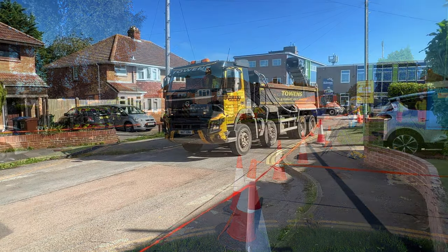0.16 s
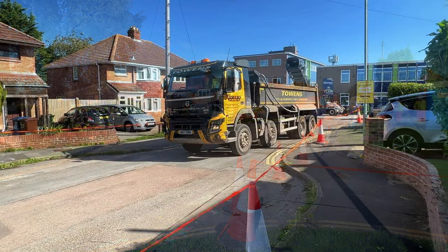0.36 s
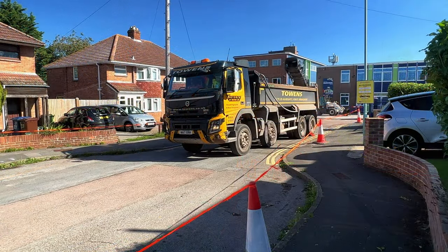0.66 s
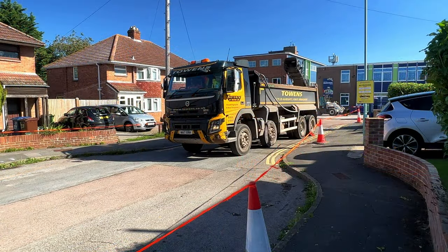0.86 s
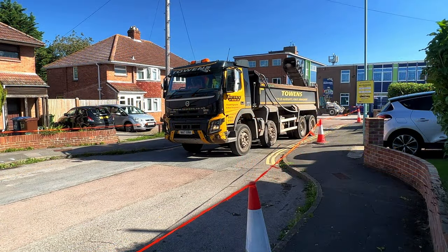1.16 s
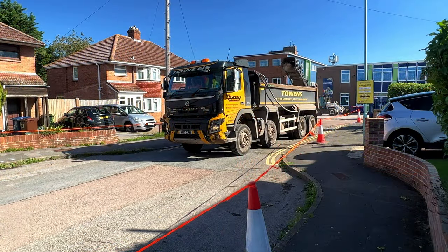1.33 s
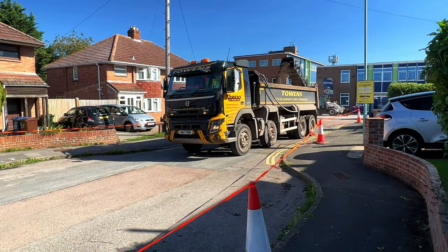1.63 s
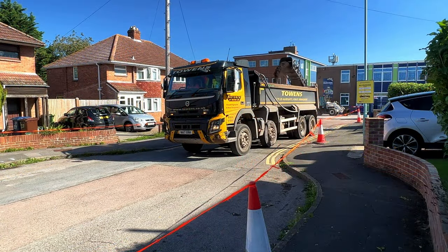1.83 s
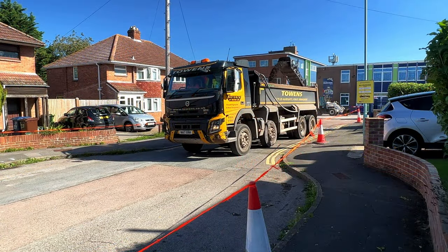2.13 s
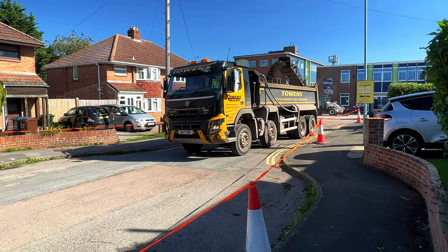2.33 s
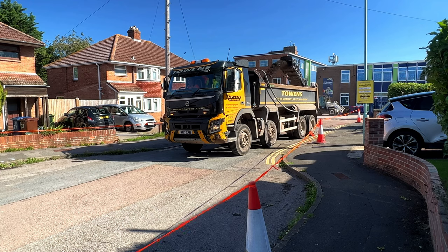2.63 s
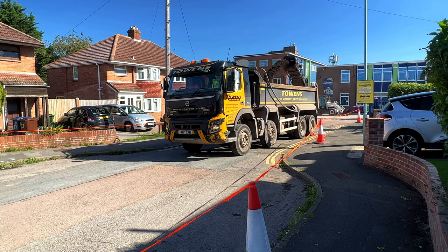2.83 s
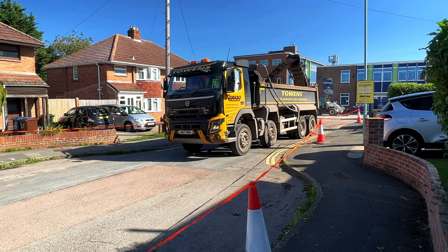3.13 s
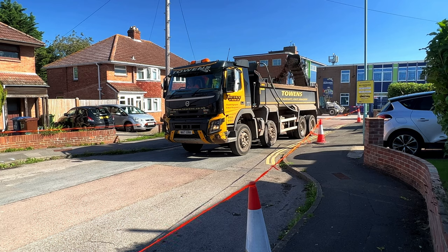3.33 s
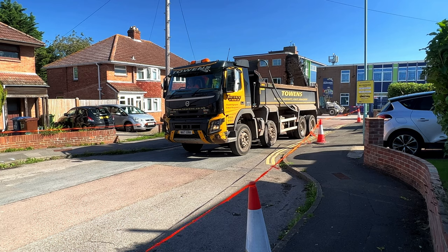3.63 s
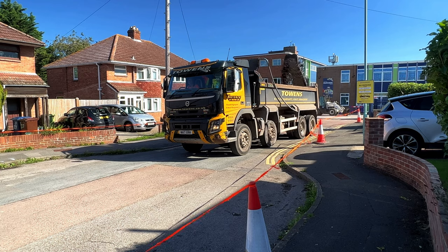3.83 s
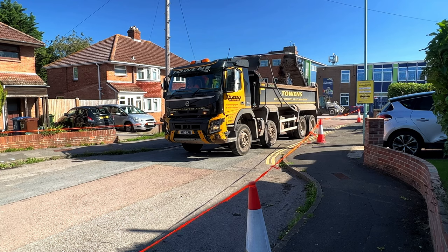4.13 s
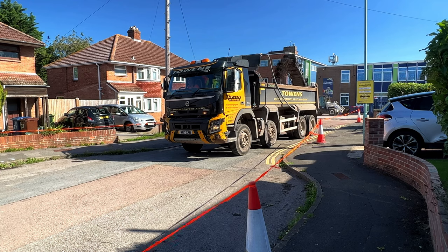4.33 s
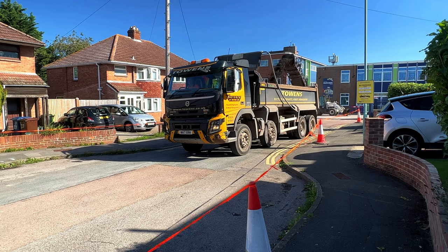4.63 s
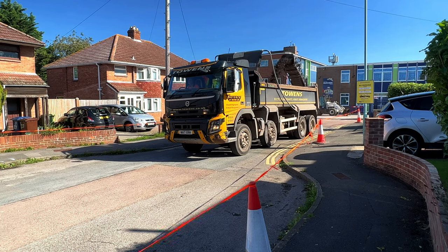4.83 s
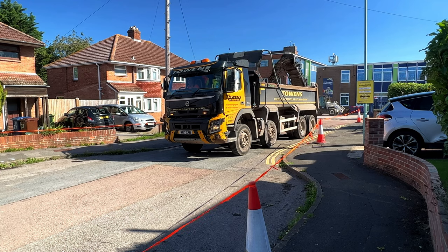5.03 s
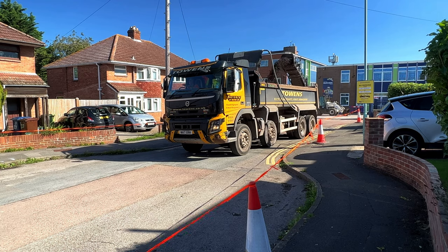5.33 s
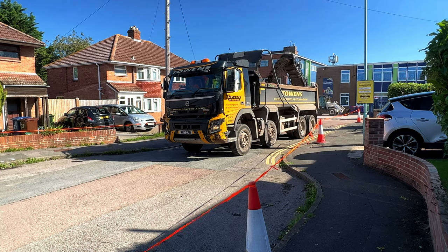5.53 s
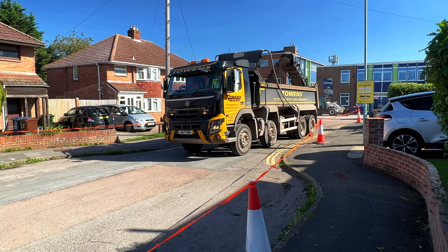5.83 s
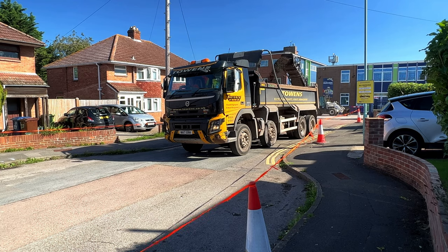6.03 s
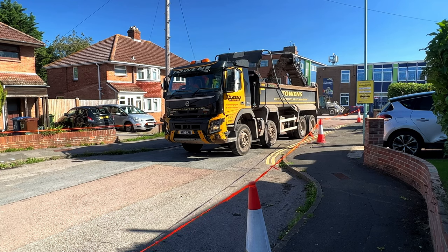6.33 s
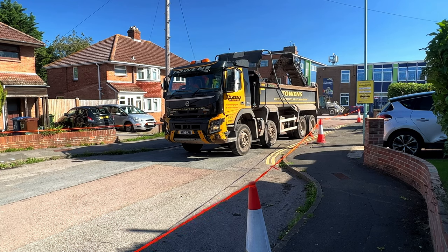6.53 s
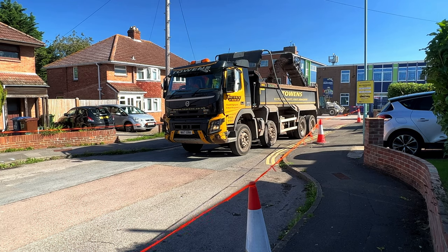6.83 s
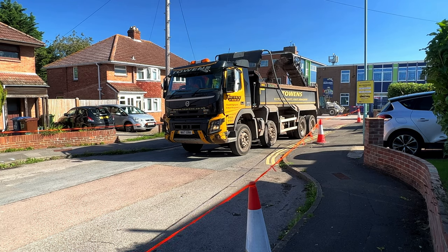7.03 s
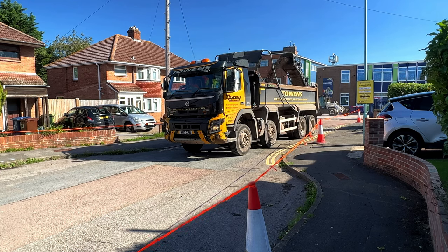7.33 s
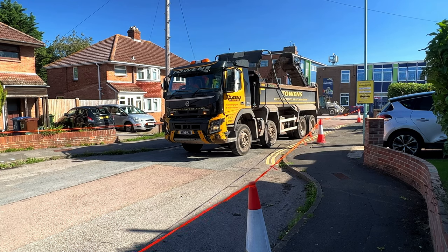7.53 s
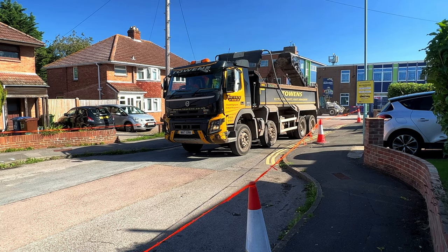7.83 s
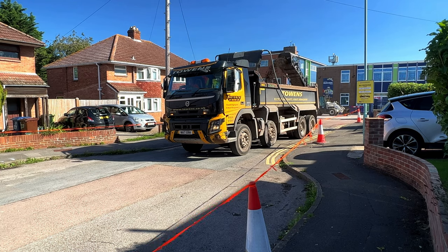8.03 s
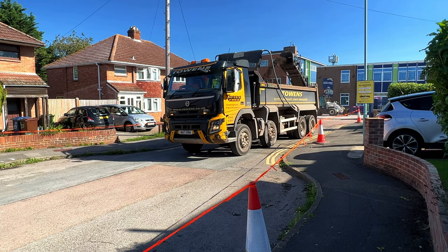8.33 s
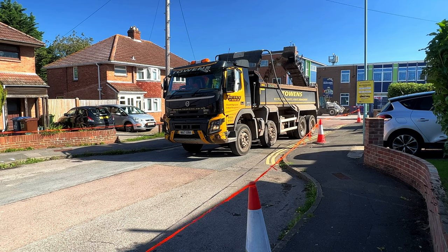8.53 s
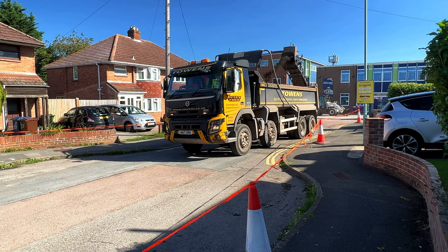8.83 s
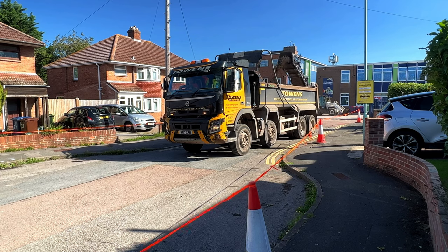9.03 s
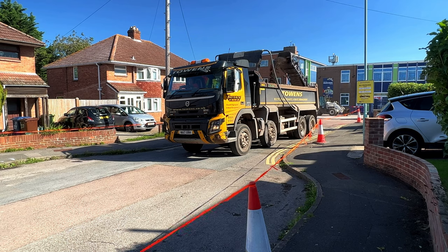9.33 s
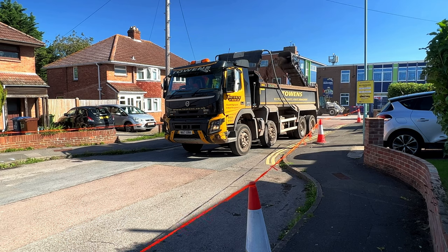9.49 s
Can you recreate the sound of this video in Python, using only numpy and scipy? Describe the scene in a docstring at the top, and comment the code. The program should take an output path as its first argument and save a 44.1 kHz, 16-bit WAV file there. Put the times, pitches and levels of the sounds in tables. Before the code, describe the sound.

A heavy diesel machine drones and grinds asphalt while broken chunks pour clattering into a steel truck body, thinning to scattered stones and grit.

```python
"""A road planer's diesel drones behind a tipper lorry in a street of houses: tones at multiples of
the engine cycle, hums of pumps and drives, shaped noise for exhaust and cutter.
Its conveyor throws milled asphalt into the lorry: a few spatters, a heavy pour that drums on the
steel body and thins to a trickle, then single clods, stones and handfuls of grit. These are random
impacts, noise bursts in resonances, and decaying modes, with a short tail from the house fronts."""
import sys
import numpy as np
from scipy import signal
from scipy.fft import rfft, irfft, next_fast_len
from scipy.io import wavfile
from scipy.ndimage import uniform_filter1d, map_coordinates

SR = 44100
rng = np.random.default_rng(int(sys.argv[2]) if len(sys.argv) > 2 else 0)


def transcribe(u):
    """Save the signal u as a 16-bit wav file named by the first command-line argument.

    u: samples, shape (n,) or (channels, n), limited to [-1, 1]; the rate is SR.
    q: integer samples, one column per channel.
    """
    v = np.clip(np.atleast_2d(u).T, -1, 1)
    q = np.round(v * 32767).astype(np.int16)
    wavfile.write(sys.argv[1], SR, q)


N = 426006

# Rough colour of the falling grit, brightest near 3 kHz; the dips at 10 and 13 kHz are not the
# grit's own. Each row: frequency in Hz, relative density in dB per Hz.
GRIT_COLOUR = [(250, -31), (600, -4), (1000, -7), (1500, -7.5), (2100, -5), (3000, -0.5), (4300, -3),
               (5200, -6.5), (6500, -7.5), (8000, -11.5), (9300, -13.5), (10000, -35), (11700, -18),
               (13000, -35), (15700, -30)]
LOUD_DB = -25.5  # drone level at which the planer's tones have their tabled balance


def planer():
    """Diesel, drives and cutter share one heard level; the cutter crunches asphalt as the pour does."""
    # How loud the drone is heard. Each row: time in seconds, drone level in dB.
    drone_rows = [(0, -27), (.7, -23.5), (2.33, -24), (2.5, -29.5), (3.3, -33), (3.8, -40), (5.2, -42.5),
                  (6.7, -41.5), (8.2, -39), (9.66, -36.5)]
    cycle_hz, cutter_db, tones_db = 15.08, -5.5, -2.0
    drone_db = curve(drone_rows)
    cycles = np.cumsum(cycle_hz * (1 + 0.0042 * wobble(3))) / SR
    tones = exhaust_tones(cycles, drone_db) + hums(drone_db)
    shared_only = np.array([[np.sqrt(2)], [0]])  # no unshared part at the ports
    drone = roar(cycles) + whine() + amp(tones_db) * tones * shared_only
    cutter = amp(cutter_db + 0.53 * wobble(11)) * crunch()
    return amp(drone_db) * (drone + cutter)


def exhaust_tones(cycles, drone_db):
    """Exhaust pulses repeat with the engine cycle, giving tones whose balance shifts with heard level."""
    # Each row: multiple of the engine cycle, relative level in dB, extra dB per dB of drone.
    order_rows = [(4, -16.5, -0.6), (5, -7.5, 0), (6, -14, -.1), (10, -10, 0.5)]
    waver_db = 2.5
    tones = np.zeros(N)
    for multiple, db, grows in order_rows:
        gain = amp(db + grows * (drone_db - LOUD_DB) + waver_db * wobble(6.6))
        tones += gain * np.sqrt(2) * np.sin(2 * np.pi * (multiple * cycles + rng.random()))
    return tones


def hums(drone_db):
    """Pumps, drives and the lorry each hum on one wandering line; one pump line is strongest."""
    # Each row: frequency in Hz, relative level in dB, extra dB per dB of drone.
    hum_rows = [(79.6, -18, -0.5), (126.3, -14.5, 0), (160, -21, -.5), (185.4, -19.5, 0), (230, -13, 0.5),
                (305.7, -16.5, -0.5), (377, -17, 0)]
    # The strongest hum. Each row: time in seconds, relative level in dB.
    pump_rows = [(0, -6), (.85, -9.5), (1.3, -12), (9.66, -14)]
    total = amp(curve(pump_rows)) * hum_tone(210.2)
    for hz, db, grows in hum_rows:
        total += amp(db + grows * (drone_db - LOUD_DB)) * hum_tone(hz)
    return total


def hum_tone(hz):
    """One sine that wanders slowly in pitch and level."""
    drift_share, waver_db = 0.00503, 3
    turns = np.cumsum(hz * (1 + drift_share * wobble(4))) / SR
    return amp(waver_db * wobble(3)) * np.sqrt(2) * np.sin(2 * np.pi * (turns + rng.random()))


def roar(cycles):
    """Exhaust noise pulses five times an engine cycle; with a rough growl band it surges unevenly."""
    # Spectrum of the exhaust. Each row: frequency in Hz, relative density in dB per Hz.
    exhaust_spectrum = [(20, -42), (38, -15), (57, -0.5), (75, -2.5), (110, 0), (160, -4.5), (200, -6),
                        (300, -5.5), (420, -6.5), (500, -10.5), (600, -12.5), (750, -23), (1500, -25),
                        (4000, -90)]
    # Growl. Each row: time in seconds, relative level in dB.
    growl_rows = [(0, -22), (.85, -22), (1.15, -5), (1.9, -5.5), (2.3, -13), (6.5, -8.5), (9.66, -7.5)]
    puffs_db, surging_db = 2.5, 1.03
    throb = np.cos(2 * np.pi * 5 * cycles)
    puffs = coloured(noise() * (1 + 0.1 * throb), exhaust_spectrum)
    growl = amp(curve(growl_rows)) * resonant(noise(), hz=295, q=2.6)
    return amp(surging_db * wobble(24)) * (amp(puffs_db) * puffs + growl)


def whine():
    """Drives and hydraulics whine roughly: noise in narrow bands."""
    # Each row: centre in Hz, distance to half gain in Hz, relative level in dB.
    whine_rows = [(436, 4.5, -16), (615, 19, -20), (1670, 28, -22), (1894, 10, -20.5)]

    def response(f):
        return sum(amp(db) * np.sqrt(SR / np.pi / width) / (1 + ((f - centre) / width) ** 2)
                   for centre, width, db in whine_rows)
    return filtered(noise(), response)


def crunch():
    """Asphalt breaking up: a rough rush studded with small impacts."""
    # Spectrum of the crunch. Each row: frequency in Hz, relative density in dB per Hz.
    grind_spectrum = [(25, -25), (70, -2), (200, -0.5), (550, 4.5), (760, 4.5), (900, 6), (1200, 4.5),
                      (1450, 2), (1900, 3), (2200, -0.5), (2750, -1.5), (3400, -15.5), (5200, -14.5),
                      (6700, -17.5), (9200, -21.5), (9900, -41), (15700, -37)]
    rush = noise() + 0.58 * impacts(900, spread_db=1.0, crumble_s=0.0015)
    return patchy(coloured(rush, grind_spectrum), depth_db=1.83)


def pour():
    """Stream and surges make one flow: more flow, denser impacts, crunch and drumming on steel."""
    # Steady stream off the conveyor. Each row: time in seconds, flow in dB.
    flow_rows = [(0, -43.5), (1.85, -43), (2.0, -24.5), (2.22, -23.5), (2.7, -21.5), (3.38, -24.5),
                 (3.55, -25), (3.9, -23), (4.52, -30.5), (4.6, -32), (5.15, -34.5), (5.35, -39),
                 (5.7, -40.5), (6.2, -38), (6.38, -45), (6.75, -46), (7.1, -46.5), (7.45, -47.5),
                 (7.8, -47), (8.4, -49), (9.66, -45.5)]
    # Heaps that tip off the belt. Each row: start in seconds, flow in dB, length in seconds.
    surge_rows = [(1.903, -29.5, 0.095), (1.987, -24, 0.16), (2.272, -21.5, 0.19), (2.537, -24.5, 0.32),
                  (2.93, -25.5, 0.045), (3.157, -27, 0.1), (3.562, -22.5, 0.15), (3.834, -29, 0.032),
                  (4.238, -27, 0.12), (4.415, -30.5, 0.096), (4.716, -32.5, 0.057), (4.892, -38, 0.12),
                  (5.373, -38, 0.08), (5.538, -35.5, 0.095), (5.77, -47, 0.1), (6.094, -41.5, 0.22),
                  (7.24, -54, 0.14), (8.82, -44.5, 0.18), (9.367, -33, 0.048), (9.422, -28.5, 0.044)]
    # Boom of the lorry body. Each row: frequency in Hz, relative density in dB per Hz.
    body_spectrum = [(40, -32), (90, -15), (125, -3.5), (170, 5), (225, -1), (275, -4), (400, 1),
                     (520, -4.5), (650, 2), (800, -9.5), (1000, -9.5), (1500, -9), (4000, -53)]
    full_db = -18.5  # flow of a full belt
    grit_db, ring_db, chips_db, crunch_db, boom_db = 3, -6.5, -6.5, -3.5, -5.5  # shares at full flow
    crunch_grows, boom_grows = 1.17, 0.78  # dB per dB of flow: even a trickle makes the body boom
    power = amp(curve(flow_rows)) ** 2
    power += sum((amp(db) * surge(s, length_s)) ** 2 for s, db, length_s in surge_rows)
    flow = np.sqrt(power) * amp(1.2 * wobble(40) - full_db)  # 1 for a full belt
    rate = 700 + 3000 * flow
    patter = impacts(rate, spread_db=1.5, crumble_s=0.0009) + 1.12 * noise()
    grit = patchy(coloured(patter, GRIT_COLOUR), depth_db=0.3)
    ring = unit(steel(impacts(0.5 * rate, spread_db=0.5, crumble_s=0.0012)))
    boom = coloured(impacts(0.5 * rate, spread_db=1.0, crumble_s=0.005), body_spectrum)
    bright = amp(grit_db) * grit + amp(ring_db) * ring + amp(chips_db) * chippings(count=2200)
    dull = amp(crunch_db) * flow ** crunch_grows * crunch() + amp(boom_db) * flow ** boom_grows * boom
    return amp(full_db) * (flow * bright + dull)


def surge(s, length_s):
    """Envelope of one heap: it swells, holds while it tips and dribbles out."""
    rise_s, t60_s = 0.019, 0.25
    t = np.maximum(np.arange(N) / SR - s, 0)
    return (1 - np.exp(-t / rise_s)) * amp(-60 * np.clip(t - length_s, 0, 1) / t60_s)


def steel(x):
    """The tipper's steel body rings: resonances of alternating sign in parallel."""
    # Each row: centre in Hz, width in Hz, gain in dB.
    steel_rows = [(910, 61, 7), (1010, 97, -7), (1170, 56, 8), (1336, 91, -4.5), (2120, 1600, -9.5),
                  (3210, 750, 2)]

    def response(f):
        return sum((-1) ** k * amp(db) * 1j * f * width / (centre ** 2 - f * f + 1j * f * width)
                   for k, (centre, width, db) in enumerate(steel_rows))
    return filtered(x, response)


def chippings(count):
    """Coarse pieces clack on the load, each with a short ring of its own pitch."""
    median_hz, scatter_octaves, life_cycles, size_spread_db = 2660, 0.752, 28, 2.5
    when, size, left, right = rng.random((count, 4)).T[:, :, None]
    hz = median_hz * 2 ** (scatter_octaves * rng.standard_normal((count, 1)))
    hz = np.clip(hz, 600, 7000)
    n = np.arange(SR // 64)
    cycles = hz * n / SR
    size_db = size_spread_db * np.minimum(-np.log(1 - size), 3)
    envelope = amp(size_db - 60 * cycles / life_cycles) * (1 - np.exp(-2 * cycles))
    at = ((when * N).astype(int) + n).ravel()
    channels = []
    for phase in (left, right):
        rings = envelope * np.sin(2 * np.pi * (cycles + phase))
        channels.append(np.bincount(at, rings.ravel(), N)[:N])
    return unit(np.array(channels))


def slides():
    """The stream rasps down the bare side wall, wandering between spots of different pitch."""
    # Each row: start in seconds, level in dB, length in seconds.
    slide_rows = [(3.605, -19.5, 0.16), (3.84, -23, 0.25), (4.21, -22, 0.11), (4.387, -26, 0.11)]
    scrape_hz, scrape_q, spot_ratio = 3020, 3.7, 1.27
    wander_db, grit_db = 1.5, -11.5
    pressure = sum(amp(db) * surge(s, length_s) for s, db, length_s in slide_rows)
    grains = impacts(700, spread_db=5.0, crumble_s=0.001)
    rasp = np.zeros((2, N))
    for k in (-1, 0, 1):
        spot = resonant(np.roll(grains, k * SR, axis=1), scrape_hz * spot_ratio ** k, scrape_q)
        rasp += amp(wander_db * wobble(12) - 10 * abs(k)) * spot
    return pressure * (unit(rasp) + amp(grit_db) * coloured(noise(), GRIT_COLOUR))


def clods():
    """Soft heavy lumps break up on the body with a dull boom."""
    # Each row: start in seconds, relative level in dB, boom in Hz, sharpness Q, t60 in seconds.
    clod_rows = [(2.188, -9, 430, 1.2, 0.29), (2.28, -12, 655, 1.4, 0.29), (2.359, -12, 1000, 1, 0.38),
                 (2.66, -17.5, 720, 1, 0.62), (2.709, -14.5, 1220, 1.6, .3), (2.81, -13, 760, 1.1, 0.12),
                 (3.003, -13.5, 370, 1.1, 0.19), (3.62, -13, 770, 1, 0.2), (3.69, -16.5, 172, 1.3, 0.32),
                 (4.42, -20, 282, 1, 0.44), (5.446, -24, 455, 1, 0.28), (5.55, -31, 390, 1.8, .3),
                 (5.95, -29, 1110, 1.2, 0.2), (6.025, -20, 560, 1, 0.25), (6.033, -23, 1220, 1.1, 0.23),
                 (6.1, -25, 620, 1, 0.23), (6.285, -26, 420, 0.66, 0.15), (6.415, -24, 1170, 1, 0.18),
                 (6.475, -33, 1100, 1.2, .2), (6.565, -29, 600, 1, .15), (6.79, -26, 620, 0.89, .22),
                 (7.99, -30, 950, 1.1, 0.22), (8.94, -31, 620, 2.2, .2), (9.435, -28, 660, 3.3, .14)]
    out = np.zeros((2, N))
    for s, db, hz, q, t60_s in clod_rows:
        add(out, s, amp(db) * burst(rise_s=0.0043, t60_s=t60_s) * panel(hz, q))
    return amp(-8.0) * out


def slabs():
    """A slab lands whole and rings the floor modes near the pitch that its blow excites most."""
    # Each row: start in seconds, relative level in dB, most excited frequency in Hz.
    slab_rows = [(2.812, -15, 900), (2.985, -12.5, 280), (3.007, -6.5, 342), (3.021, -13, 300),
                 (5.149, -21, 920), (5.438, -23, 380), (5.451, -17.5, 200), (5.478, -24, 400),
                 (5.513, -27, 190), (6.04, -30, 740), (8.771, -29, 615)]
    # Modes of the tipper floor. Each row: frequency in Hz, relative level in dB, t60 in seconds.
    floor_modes = [(196, 0, 0.094), (239, -6, 0.18), (329, -0.5, 0.13), (401, -4, 0.12), (591, -2.5, 0.21),
                   (657, -2.5, 0.16), (762, -5, .13), (903, -1.5, 0.13), (1165, -6, 0.11), (1420, -2, .1)]
    spread_octaves, contact_s = 0.51, 0.0029
    out, t = np.zeros((2, N)), np.arange(SR // 2) / SR
    hz, mode_db, t60_s = np.transpose(floor_modes)[:, :, None]
    for s, db, centre_hz in slab_rows:
        share = np.exp(-0.5 * (np.log2(hz / centre_hz) / spread_octaves) ** 2)
        detune = 1 + 0.012 * rng.standard_normal(hz.shape)
        modes = share * amp(mode_db - 60 * t / t60_s) * np.sin(2 * np.pi * hz * detune * t)
        ring = (1 - np.exp(-t / contact_s)) * modes.sum(axis=0)
        add(out, s, amp(db) * ring * np.array([[1], [0.3]]))  # shared, unshared part
    return out


def stones():
    """A hard crack with a brief ring of steel; low rings last longer."""
    # Each row: start in seconds, relative level in dB, ring in Hz.
    stone_rows = [(0.454, -29, 6360), (2.369, -6, 2800), (2.807, -8, 2900), (2.98, -7, 3170),
                  (3.836, -13, 2990), (3.863, -6, 3350), (3.921, -8, 3120), (4.227, -14, 2900),
                  (4.343, -14, 2950), (5.146, -19, 3000), (6.125, -22, 2300), (6.168, -24, 2800),
                  (6.412, -26, 2800), (6.573, -33, 1260), (7.623, -24.5, 3050), (7.625, -28, 2060),
                  (9.349, -20, 3670), (9.412, -18, 3000), (9.563, -22, 2950)]
    out, grit = np.zeros((2, N)), coloured(noise(), GRIT_COLOUR)
    for s, db, hz in stone_rows:
        crack = amp(-17.5) * burst(rise_s=0.0004, t60_s=0.088) * second_of(grit, s)
        ring = amp(-7.0) * burst(rise_s=0.00066, t60_s=150 / hz) * panel(hz, q=4300 / hz)
        add(out, s, amp(db) * (crack + ring))
    return out


def spills():
    """Handfuls of grit and coarse pieces patter on the side, ring the spot they hit and die away."""
    # Each row: start in seconds, relative level in dB, rise in seconds, t60 in seconds, brightest Hz.
    spill_rows = [(.075, -32, .012, .17, 5840), (.352, -35, .008, 0.17, 3700),
                  (.668, -41, .035, 0.16, 6200), (.912, -35, .012, 0.081, 5740),
                  (1.168, -29.5, .015, 0.24, 4200), (1.67, -37, .015, 0.34, 3700),
                  (1.774, -33, 0.0063, 0.36, 5600), (5.758, -34, .004, 0.13, 2870),
                  (5.84, -35.5, 0.017, 0.2, 3000), (5.94, -34, .015, 0.25, 2900),
                  (6.04, -41, .004, 0.24, 3000), (6.105, -34, 0.022, 0.34, 2700),
                  (6.412, -38.5, .016, 0.25, 2500), (6.485, -41, 0.011, 0.2, 2600),
                  (6.56, -37, .015, 0.2, 3080), (6.8, -41, .01, 0.18, 3000),
                  (6.849, -40.5, 0.0088, 0.11, 3200), (7.072, -38, .002, .12, 3200),
                  (7.915, -40.5, 0.018, .35, 3400), (7.988, -40.5, .014, .2, 3100),
                  (8.103, -37, 0.016, 0.22, 3000), (8.749, -35.5, .015, .3, 3200),
                  (8.883, -34, .014, 0.13, 3400), (9.068, -34.5, .008, 0.18, 3200),
                  (9.185, -39, .014, 0.15, 3100), (9.352, -30.5, .04, 0.59, 3700),
                  (9.556, -32, .008, 0.37, 3020)]
    # Spectrum of scattering grit. Each row: frequency in Hz, relative density in dB per Hz.
    spray_spectrum = [(60, -25), (500, 0), (1200, 1.5), (2000, 1), (3300, 6.5), (5000, 1), (6300, 1),
                      (9000, -5.5), (11300, -23), (16000, -23)]
    clack_db, spot_db = -5, -2.5
    out = np.zeros((2, N))
    grains = impacts(1200, spread_db=0.4, crumble_s=0.00097)
    spray = patchy(coloured(grains, spray_spectrum), depth_db=3.0)
    clacks = chippings(count=2600)
    for s, db, rise_s, t60_s, hz in spill_rows:
        patter = second_of(spray, s) + amp(clack_db) * second_of(clacks, s)
        spot = amp(spot_db) * resonant(second_of(spray, s + 1), hz, q=1.4)
        add(out, s, amp(db) * burst(rise_s, t60_s) * (patter + spot))
    return out


def panel(hz, q):
    """The crowded modes of a steel panel: one second of noise in a resonance."""
    return resonant(rng.standard_normal((2, SR)), hz, q)


def impacts(rate, spread_db, crumble_s):
    """Random impacts, rate a second, many small and few large; the energy of each decays in crumble_s."""
    size = amp(spread_db * np.minimum(rng.exponential(size=N), 4))
    hits = size ** 2 * (rng.random(N) < rate / SR) / rate
    energy = signal.lfilter([1], [1, -np.exp(-1 / (crumble_s * SR))], hits)
    return unit(noise() * np.sqrt(energy))


def patchy(x, depth_db):
    """Each lump has a colour of its own: gains that change quickly in time and frequency."""
    z = signal.stft(x, nperseg=512)[2]
    field = uniform_filter1d(rng.standard_normal(z.shape[1:]), size=9, axis=0)
    field = uniform_filter1d(field, size=4, axis=1)
    return unit(signal.istft(z * amp(depth_db * unit(field)), nperseg=512)[1][:, :N])


def street(x, wet_db):
    """House fronts add a short diffuse tail, drawn anew every eighth of a second of sound."""
    # Each row: frequency in Hz, t60 in seconds.
    decay_rows = [(100, 0.97), (1000, 0.38), (4000, 0.45), (12000, 0.32)]
    echo, step = np.zeros((2, N + SR)), SR // 8
    for start in range(0, N, step):
        hz, t, z = signal.stft(rng.standard_normal((2, SR // 3)), SR, nperseg=256)
        decay = amp(-60 * t / along(decay_rows, hz)[:, None])
        tail = signal.istft(z * decay, SR, nperseg=256)[1]
        part = signal.fftconvolve(x[:, start:start + step], tail / np.linalg.norm(tail[0]), axes=1)
        echo[:, start:start + part.shape[1]] += part
    return (x + amp(wet_db) * echo[:, :N]) / np.hypot(1, amp(wet_db))


def ports(x):
    """A shared and an unshared part reach two microphone ports, which differ in level and phase."""
    # Each row: frequency in Hz, likeness of the ports (1 is identical).
    alike_rows = [(25, .3), (70, 0.91), (300, 0.81), (600, 0.74), (1800, 0.56), (3000, 0.41), (4300, 0.097),
                  (5500, 0.29), (8000, 0.025), (10000, 1)]
    # Each row: frequency in Hz, left over right in dB.
    tilt_rows = [(100, 1.7), (300, 0.5), (1800, 0), (2500, 1), (2900, 3.5), (3800, 1.5), (4600, 7.5),
                 (5400, 5.5), (6500, 8.5), (8000, 1.5), (10000, 0)]
    # Each row: frequency in Hz, lead of the left in radians.
    lead_rows = [(50, 0), (300, -0.05), (700, -1.23), (1500, -1.26), (2500, -0.84), (3400, -1.54),
                 (4300, -0.15), (5200, -3.5), (6500, 0.5), (8500, -1.96), (10000, -1.7)]

    def shares(hz):
        turn = np.arccos(np.clip(along(alike_rows, hz), -1, 1)) / 2
        return np.array([np.cos(turn), np.sin(turn)])

    def offsets(hz):
        half = np.array([[0.5], [-0.5]])
        return amp(half * along(tilt_rows, hz)) * np.exp(1j * half * along(lead_rows, hz))
    mid, side = filtered(x, shares)
    return filtered(np.array([mid + side, mid - side]), offsets)


def amp(db):
    """Decibels to gain."""
    return 10 ** (np.asarray(db) / 20)


def unit(x):
    """Scaled to rms 1."""
    return x / np.sqrt(np.mean(x ** 2) + 1e-20)


def along(points, hz):
    """(Hz, value) points read on a log axis."""
    f, v = np.transpose(points)
    return np.interp(np.log(hz + 1), np.log(f + 1), v)


def curve(rows):
    """(seconds, value) rows as one value per sample."""
    return np.interp(np.arange(N) / SR, *np.transpose(rows))


def wobble(rate):
    """A smooth random curve, rate knots a second."""
    knots = rng.standard_normal(int(N * rate / SR) + 4)
    return map_coordinates(knots, [np.arange(N) * rate / SR], order=2)


def noise():
    """Two unrelated white noises."""
    return rng.standard_normal((2, N))


def filtered(x, response):
    """x through a complex response of frequency."""
    m = next_fast_len(N + SR // 2, True)
    return irfft(rfft(x, m) * response(np.fft.rfftfreq(m, 1 / SR)), m)[..., :N]


def coloured(x, spectrum):
    """x shaped by the given spectrum, at rms 1."""
    return unit(filtered(x, lambda hz: amp(along(spectrum, hz))))


def resonant(x, hz, q):
    """x twice through a resonance, at rms 1."""
    b, a = signal.iirpeak(min(hz, SR / 4), max(q, 0.8), fs=SR)
    return unit(signal.lfilter(b, a, signal.lfilter(b, a, x)))


def burst(rise_s, t60_s):
    """A one-second envelope of peak 1 that swells and dies away."""
    t = np.arange(SR) / SR
    shape = (1 - np.exp(-t / rise_s)) * amp(-60 * t / t60_s)
    return shape / shape.max()


def second_of(x, s):
    """One second of x from time s on, wrapping at the end."""
    return x.take(round(s * SR) + np.arange(SR), axis=1, mode="wrap")


def add(out, s, sound):
    """Mix a short stereo sound in at time s."""
    part = out[:, max(round(s * SR), 0):][:, :sound.shape[1]]
    part += sound[:, :part.shape[1]]


def scene():
    """The machine, and the falling asphalt with its tail from the house fronts."""
    asphalt = pour() + slides() + clods() + slabs() + stones() + spills()
    return ports(planer() + street(asphalt, wet_db=-4.0))


def record(dry):
    """The highest peaks are rounded off and nothing is kept above the band limit."""
    peak_top, top_hz = 0.9, 15700
    rounded = dry / (1 + (dry / peak_top) ** 6) ** (1 / 6)
    return filtered(rounded, lambda hz: hz < top_hz)


dry = scene()
out = record(dry)
transcribe(out)
```